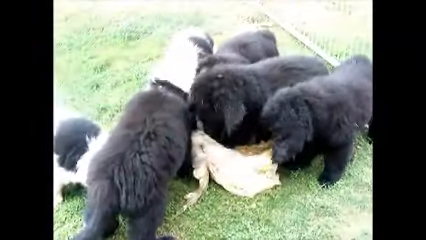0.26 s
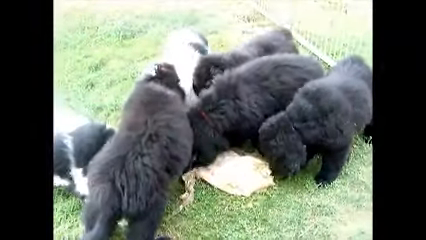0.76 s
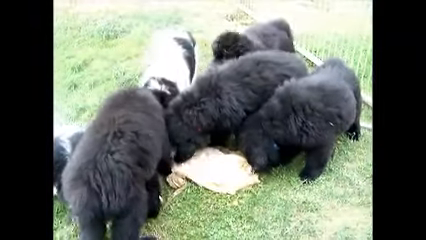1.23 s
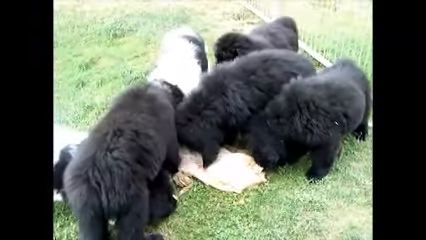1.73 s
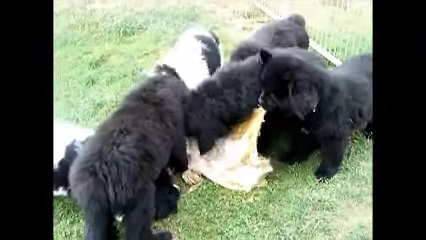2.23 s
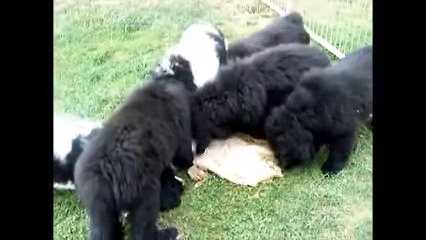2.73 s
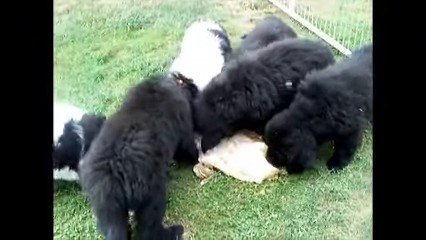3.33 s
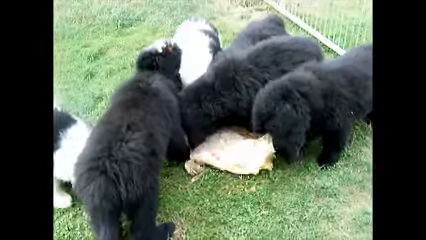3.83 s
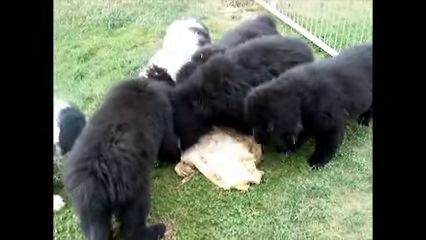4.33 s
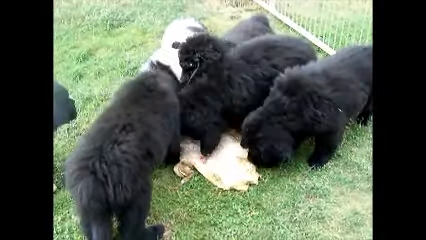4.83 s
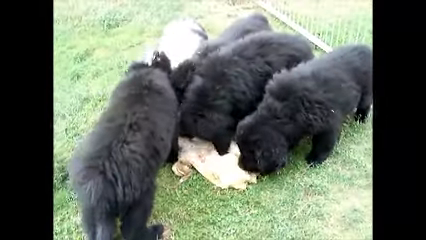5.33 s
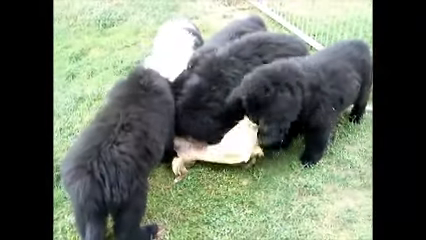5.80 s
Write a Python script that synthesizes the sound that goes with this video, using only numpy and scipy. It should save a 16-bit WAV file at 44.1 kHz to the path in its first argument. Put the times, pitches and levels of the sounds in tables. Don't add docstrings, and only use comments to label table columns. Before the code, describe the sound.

Three puppies chew wet food on a lawn with sharp clicks, smacks and snorts, while birds whistle and chirp over a faint town drone.

```python
import sys
import numpy as np
from scipy import signal
from scipy.fft import rfft, irfft, next_fast_len
from scipy.io import wavfile
from scipy.ndimage import uniform_filter1d, map_coordinates

SR = 44100
rng = np.random.default_rng(int(sys.argv[2]) if len(sys.argv) > 2 else 0)


def ratio_of_db(decibels):
    return 10 ** (np.asarray(decibels, float) / 20)


def pcm_store(signal):
    levels = np.round(np.clip(np.atleast_2d(signal), -1, 1) * 32767)
    wavfile.write(sys.argv[1], SR, levels.astype(np.int16).T)


N = 267246


def unit(x):
    return x / np.sqrt(np.mean(x ** 2) + 1e-20)


def along(points, hz):
    f, v = np.transpose(points)
    return np.interp(np.log(hz + 1), np.log(f + 1), v)


def shape(spectrum):
    return lambda hz: ratio_of_db(along(spectrum, hz))


def curves(rows):
    s, *cols = np.transpose(rows)
    return [np.interp(np.arange(N) / SR, s, c) for c in cols]


def span(rows):
    s, *cols = np.transpose(rows)
    at = np.arange(round(s[0] * SR), min(round(s[-1] * SR), N))
    fade = np.clip(np.minimum(at - at[0], at[-1] - at) / (.004 * SR), 0, 1)
    return at, fade, [np.interp(at / SR, s, c) for c in cols]


def wobble(rate, size=N):
    knots = rng.standard_normal(int(size * rate / SR) + 4)
    return map_coordinates(knots, [np.arange(size) * rate / SR])


def sides(pan_db):
    return ratio_of_db(np.array([pan_db / 2, -pan_db / 2]))


def filtered(x, response):
    m = next_fast_len(N + 8192)
    return irfft(rfft(x, m) * response(np.fft.rfftfreq(m, 1 / SR)), m)[..., :N]


# frequency in Hz, likeness from 0 to 1.
LIKENESS = [(60, 0.61), (120, 0.57), (230, 0.59), (460, 0.64), (920, 0.51), (1810, 0.08), (3590, 0.038),
            (7090, 0.079)]


def rush(gain, patchy_db):
    z = signal.stft(rng.standard_normal((2, N)), nperseg=512)[2]
    field = uniform_filter1d(rng.standard_normal(z.shape[1:]), size=6, axis=0)
    field = uniform_filter1d(field, size=8, axis=1)
    pair = signal.istft(z * ratio_of_db(patchy_db * unit(field)), nperseg=512)[1][:, :N]

    def mid_side_gain(hz):
        turn = np.arccos(np.clip(along(LIKENESS, hz), -1, 1)) / 2
        return gain(hz) * [np.cos(turn), np.sin(turn)]

    mid, side = filtered(pair, mid_side_gain)
    return unit(np.array([mid + side, mid - side]))


def pops(rows, colour, ms, size=768):
    s, db, hz, pan_db, crack_db = np.transpose(rows)[..., None]
    luck = rng.random((len(rows), 2)).T[..., None]
    film = rng.standard_normal((len(rows), size + 4))
    t = np.arange(size) / SR
    u = t / (ms / 1000 * (.75 + .5 * luck[0]))
    swell = 3 * u * np.exp(1 - 3 * u)
    at = (np.round(s * SR).astype(int) + np.arange(size)).ravel()
    tones, cracks = np.zeros((2, 2, N))
    for side in (0, 1):
        late = t - (side - .5) * (luck[1] - .5) * .0002
        gain = ratio_of_db(db + (.5 - side) * np.clip(pan_db, -7, 7))
        tone = gain * swell * np.sin(2 * np.pi * hz * late)
        tones[side] = np.bincount(at, tone.ravel(), N + size)[:N]
        crack = film[:, 3 * side:][:, :size] * np.sqrt(u) * np.exp(-4.5 * u)
        crack /= np.linalg.norm(crack, axis=1, keepdims=True) / np.sqrt(ms * 12)
        cracks[side] = np.bincount(at, (gain * ratio_of_db(crack_db) * crack).ravel(), N + size)[:N]
    return tones + filtered(cracks, shape(colour))


def sing(rows, pan_db=0., shake_hz=0., rate_hz=100., drift_hz=45.0):
    at, fade, (hz, db, *pan) = span(rows)
    beat = np.cumsum(rate_hz * (1 + 0.36 * wobble(90, size=len(at)))) / SR
    shake = shake_hz * signal.sawtooth(2 * np.pi * beat, .2)
    pitch = hz + shake + drift_hz * wobble(150, size=len(at))
    voice = np.sqrt(2) * fade * ratio_of_db(db) * np.sin(2 * np.pi * np.cumsum(pitch) / SR)
    out = np.zeros((2, N))
    out[:, at] = voice * sides(pan[0] if pan else np.full(len(at), pan_db))
    return out


# frequency in Hz, time to fall by 60 dB in seconds.
ECHO_TIMES = [(300, 0.2), (3000, 0.21), (8000, 0.18)]


def yard(x, gap=.012):
    hz, t, z = signal.stft(rng.standard_normal((2, SR // 2)), SR, nperseg=256)
    decay = ratio_of_db(-60 * t / along(ECHO_TIMES, hz)[:, None])
    tail = signal.istft(z * decay, SR, nperseg=256)[1]
    tail = np.pad(tail / np.linalg.norm(tail[0]), ((0, 0), (round(abs(gap) * SR), 0)))
    return signal.fftconvolve(x.mean(axis=0)[None], tail, axes=1)[:, :N]


# time in seconds, peak in dB, cavity pitch in Hz, crack in dB against the cavity tone.
LEFT_PUP = [(0.2674, -11.5, 5840, 1.5), (0.7489, -26, 6100, 3), (0.7806, -15, 5690, 1.5),
            (1.3608, -22.5, 5740, -0.5), (1.4462, -26, 5980, -6), (1.9598, -18.5, 6030, -2.5),
            (2.7086, -26, 5980, -4), (3.0857, -21, 5900, -0.5), (3.304, -17.5, 6250, 3),
            (3.444, -20, 5900, 2), (3.6185, -14, 5740, 0.5), (3.6562, -16, 5580, 1), (4.629, -13, 5590, 1),
            (4.696, -27.5, 5050, -6.5), (5.0071, -21, 6040, 8.5)]
HIGH_RIGHT_PUP = [(0.0618, -7, 5280, -0.5), (0.3422, -15.5, 3820, 6), (0.3628, -13.5, 5070, 0),
                  (0.4973, -20.5, 4740, 3), (0.6601, -15, 3870, 7), (1.042, -28.5, 4770, 2),
                  (2.37, -27, 5440, 12.5), (3.2334, -12.5, 5060, -6), (3.8913, -22, 4960, 7.5),
                  (3.999, -18.5, 3400, -3), (4.0833, -17.5, 5850, 1), (4.1262, -21.5, 4770, 4.5),
                  (4.678, -30.5, 5630, 9), (4.9013, -20, 3480, 3), (4.9456, -21, 3600, 2),
                  (5.1907, -20.5, 5470, -1), (5.3233, -18, 4470, 1), (5.536, -20, 4330, 3.5),
                  (5.601, -13, 2950, 2), (5.6553, -35, 3120, -0.5), (5.8735, -14, 5200, 8),
                  (5.891, -25.5, 4840, 11.5)]
LOW_RIGHT_PUP = [(0.0434, -19, 3660, 1.5), (0.38, -20, 3350, 3.5), (0.9752, -31.5, 3360, 0),
                 (.194, -6.5, 4150, -4), (0.326, -20, 3800, -2.5), (.7086, -13, 3270, 2.5),
                 (0.9183, -17.5, 3110, 1.5), (0.946, -31.5, 3330, 5.5), (1.6078, -38, 3600, 11),
                 (3.2913, -11, 3000, 2.5), (3.471, -19.5, 4680, 4), (3.5765, -30.5, 2880, 2),
                 (4.8268, -26.5, 3630, 3.5), (4.917, -22, 2670, 2), (5.017, -19.5, 3480, 8),
                 (5.257, -28.5, 3590, -6.5), (5.7814, -31, 3490, 6.5), (5.8031, -24, 2860, 5.5),
                 (5.855, -17, 3620, -10), (5.9182, -12.5, 3600, 0.5)]
# left minus right in dB, one number for each puppy in the same order.
PUP_PANS = (8, -5, -5.5)
# time in seconds, peak in dB, cavity pitch in Hz, pan in dB.
WET_TICKS = [(0.2204, -21, 4590, -6.5), (0.2298, -19, 4600, 1.0), (0.2386, -17, 4140, 0),
             (0.3184, -22, 3780, -1.5), (0.7039, -18.5, 3200, -1.5), (0.928, -26.5, 3470, -0.5),
             (1.0104, -38.5, 5770, 3), (2.9218, -21, 4860, 6.5), (2.928, -27, 4240, -1),
             (2.9334, -20, 4960, 5), (2.9434, -24.5, 4680, 2), (2.9762, -18, 5640, 6.0),
             (2.9795, -21.5, 5650, 9.5), (3.018, -23.5, 5850, -2), (3.0338, -23, 3830, 4),
             (3.0964, -22.5, 5700, 4), (3.4817, -26, 3300, 2), (3.4917, -16.5, 5000, -1.5),
             (3.504, -21, 4870, 1.5), (3.5167, -22, 5540, 8), (3.5226, -15.5, 5370, 3),
             (3.7748, -19, 5640, 1), (3.8404, -22, 4510, -3), (3.8562, -22, 5940, 1),
             (3.8696, -25.5, 4530, 0), (3.882, -22, 5940, -0.5), (3.9052, -15.5, 4820, -7),
             (3.9785, -21, 5190, -4), (5.7494, -18, 6500, 3.5), (5.7662, -23, 5850, 7.5),
             (5.8108, -17.5, 5930, 1.5)]
# time in seconds, peak in dB, centre in Hz, crack in dB.
FOOD_SLAPS = [(.659, -24.5, 285, -0.5), (.9175, -31, 247, 0.5), (2.085, -31.5, 1150, 8),
              (2.101, -25.5, 1385, 4.5), (2.338, -32.5, 835, 8.5), (2.919, -26.5, 846, -20),
              (2.96, -28, 266, -7), (3.878, -26, 1740, 8), (3.999, -34.5, 526, 11), (4.335, -27, 257, 7.5),
              (4.353, -26.5, 318, 11.5), (4.555, -28, 254, 1.5), (4.574, -24.5, 248, -11),
              (4.6, -36.5, 301, 9.5), (5.029, -26, 248, -4.5), (5.699, -35, 860, 11),
              (5.984, -31.5, 1340, 4), (5.999, -33, 493, 8.5)]
# frequency in Hz, level in dB.
CRACK_COLOUR = [(500, -25.5), (1500, -17), (2500, -4), (4000, 3), (5800, 2), (7000, -5.5), (8500, -15.5)]
SLAP_COLOUR = [(80, -44.5), (180, -7), (700, 6.5), (1500, 7.5), (2500, 2), (5000, -9.5)]


def chewing():
    mouths = zip((LEFT_PUP, HIGH_RIGHT_PUP, LOW_RIGHT_PUP), PUP_PANS)
    clicks = np.vstack([np.insert(rows, 3, pan_db, axis=1) for rows, pan_db in mouths])
    slaps = np.insert(FOOD_SLAPS, 3, 2, axis=1)
    ticks = np.insert(WET_TICKS, 4, 1.5, axis=1)
    out = ratio_of_db(-5.5) * pops(ticks, CRACK_COLOUR, ms=3.2)
    out += ratio_of_db(-1.0) * pops(clicks, CRACK_COLOUR, ms=1.96)
    return out + ratio_of_db(-0.5) * pops(slaps, SLAP_COLOUR, ms=4.13)


# start, loudest moment and end in seconds, nose level in dB, throat level in dB.
SNORTS = [(0.197, 0.244, .3, -22.5, -61), (0.282, 0.36, .4, -27, -47), (0.646, 0.703, .72, -34, -59),
          (2.921, 2.927, 2.975, -32.5, -45.5), (2.967, 3.023, 3.075, -36.5, -40),
          (3.438, 3.468, 3.495, -20, -36.5), (3.471, 3.512, 3.545, -25, -36.5),
          (3.734, 3.777, 3.84, -39, -41.5), (3.844, 3.896, 3.94, -29.5, -43.5),
          (4.043, 4.067, 4.1, -31, -62), (4.883, 4.925, 4.93, -27.5, -44.5),
          (5.427, 5.44, 5.49, -28.5, -41.5)]
# frequency in Hz, density in dB per Hz.
NOSE_COLOUR = [(1060, -54), (1800, -10.5), (2430, -13.5), (2630, -6), (3090, -2), (3380, 1.5), (3670, -0.5),
               (4140, 2), (4960, 3.5), (6220, 0), (7540, -9.5), (9800, -51), (16600, -120)]
THROAT_COLOUR = [(180, -49.5), (300, -20.5), (686, -4), (830, 0.5), (1190, -3.5), (1590, 1.5), (2070, -5),
                 (2400, 4.5), (3120, -37), (5280, -120)]
# centre in Hz, width in Hz, lift in dB.
NOSTRILS = [(820, 120, 7), (1500, 220, 4), (2700, 200, 6), (3800, 180, 6), (4850, 300, 6), (5600, 200, 3)]


def snorts():
    nose_swell_db, throat_swell_db = 13.5, 4.5

    def lift(hz):
        return ratio_of_db(sum(db / (1 + ((hz - centre) / width) ** 2) for centre, width, db in NOSTRILS))

    nose = rush(lambda hz: lift(hz) * shape(NOSE_COLOUR)(hz), patchy_db=-2.5)
    throat = rush(lambda hz: lift(hz) * shape(THROAT_COLOUR)(hz), patchy_db=0.5)
    sputter = ratio_of_db(3.2 * wobble(350) + 1.5 * wobble(60) - 1)
    out = np.zeros((2, N))
    for start, peak, end, nose_db, throat_db in SNORTS:
        at, fade, (sunk,) = span([(start, 1), (peak, 0), (end, 1)])
        air = ratio_of_db(nose_db - nose_swell_db * sunk) * nose[:, at]
        air += ratio_of_db(throat_db - throat_swell_db * sunk) * throat[:, at]
        out[:, at] += fade * sputter[at] * air
    return out * sides(np.full(N, -2.5))


def arc(start, end, first_hz, last_hz, dbs):
    middle = ((start + end) / 2, (first_hz + last_hz) / 2, dbs[1])
    return [(start, first_hz, dbs[0]), middle, (end, last_hz, dbs[2])]


# start and end in seconds, first and last pitch in Hz, level in dB.
SQUEAKS = [(.12, .155, 3350, 3250, -53), (.145, .2, 2730, 3100, -48), (.52, .545, 2720, 2800, -54),
           (.55, .6, 2280, 2680, -52), (.595, .65, 2750, 3150, -52), (.58, .625, 3420, 3050, -50),
           (.662, .69, 2730, 2680, -50), (.795, .9, 2740, 2770, -50), (1.05, 1.12, 3650, 3000, -53),
           (1.315, 1.345, 3020, 3020, -46), (1.36, 1.48, 3060, 3080, -57), (2.92, 2.96, 860, 820, -48),
           (2.925, 2.95, 4030, 3960, -46), (2.925, 2.99, 2900, 2620, -52), (3.46, 3.53, 3720, 3680, -45),
           (3.65, 3.76, 3870, 3820, -50), (3.765, 3.86, 3290, 3170, -48), (3.75, 3.815, 1640, 1480, -50),
           (3.855, 3.91, 800, 820, -52), (3.94, 4.005, 830, 870, -51), (4.12, 4.2, 5800, 5750, -46),
           (4.36, 4.52, 3700, 3550, -49), (4.5, 4.58, 4780, 4750, -51)]


def squeaks():
    tones = sum(sing(arc(a, b, first, last, (db, db + 2, db)), pan_db=-5, drift_hz=20)
                for a, b, first, last, db in SQUEAKS)
    return tones * ratio_of_db(.5 + np.clip(1.8 * wobble(40) + 2 * wobble(120), -10, 3))


# start in seconds, length in seconds, held pitch in Hz, level in dB, settling time in seconds.
WHISTLES = [
    (4.588, .062, 5500, -38, .014),
    (4.74, .078, 5580, -29, .02),
    (4.916, .077, 5480, -24.5, .018),
    (5.088, .07, 5540, -23, .016),
    (5.256, .07, 5610, -20.5, .011),
    (5.419, .068, 5635, -19, .012),
    (5.584, .068, 5700, -25, .008),
]


def whistles():
    slide_hz, swell_db = 440, 13
    out = 0
    for start, length, held_hz, end_db, settle in WHISTLES:
        s = np.linspace(start, start + length, num=14)
        left = np.exp(-(s - start) / settle)
        points = np.transpose([s, held_hz + slide_hz * left, end_db - swell_db * left ** 1.5])
        out = out + ratio_of_db(.8 * wobble(70)) * sing(points, pan_db=11, drift_hz=12)
    out[1] = np.roll(out[1], 3)
    return out


def flutters():
    out = 0
    for start, _, _, note_db, _ in WHISTLES:
        s, hz, db = start - .03, 5450, note_db - 8
        fall = [(s - .022, hz, db - 12), (s, hz, db), (s + .02, hz - 450, db - 7)]
        out = out + sing(fall, pan_db=5, shake_hz=350, rate_hz=380, drift_hz=180)
        upper = [(s - .012, 5950, db - 5), (s + .016, 5850, db - 4)]
        out += sing(upper, pan_db=8, drift_hz=60)
    return out


# time in seconds, pitch in Hz, level in dB.
NEAR_CALL = [
    (5.905, 4800, -31),
    (5.914, 5800, -36),
    (5.926, 7450, -31),
    (5.942, 6450, -20),
    (5.958, 5650, -13),
]
# start and end in seconds, first and last pitch in Hz, level in dB.
STRANDS = [(5.959, 5.973, 6150, 5750, -13), (5.973, 5.984, 5800, 5450, -10),
           (5.981, 5.995, 5700, 5100, -14), (5.986, 6.003, 6200, 5750, -15), (5.992, 6.0, 5250, 4850, -15),
           (5.997, 6.007, 5150, 4550, -4), (6.007, 6.02, 5500, 4800, -19), (6.012, 6.024, 6000, 5600, -21),
           (6.024, 6.036, 5500, 5150, -13), (6.032, 6.045, 5400, 4750, -17), (6.02, 6.04, 4500, 3500, -29),
           (6.04, 6.058, 4600, 3600, -30)]


def near_sparrow():
    strands = sum(sing(arc(a, b, first, last, (db + 4.5, db, db - 12)), pan_db=-7.5, drift_hz=30)
                  for a, b, first, last, db in STRANDS)
    flicker = ratio_of_db(-1 + 1.5 * np.array([wobble(220), wobble(220)]))
    return (sing(NEAR_CALL, pan_db=0, drift_hz=30) + strands) * flicker


# share of its length, pitch in Hz, level in dB.
CHIRP_FALL = [
    (0, 4650, 1),
    (.2, 4696, 3),
    (.5, 4130, -2),
    (.78, 3614, -4.5),
    (1, 3190, -32),
]
# start in seconds, length in seconds, pitch ratio, level in dB.
CHIRPS = [
    (1.731, 0.034, 0.8, -40.5),
    (1.784, 0.095, 1.0, -29),
    (4.151, .105, 0.93, -31),
    (5.31, .1, 1.09, -32),
    (5.999, 0.085, 1.03, -35),
]


def harsh_chirps():
    lower = upper = 0
    for start, length, ratio, db in CHIRPS:
        rows = np.multiply(CHIRP_FALL, (length, ratio, 1)) + (start, 0, db)
        lower = lower + sing(rows, -9.5, shake_hz=480, rate_hz=110, drift_hz=260)
        raised = np.multiply(rows, (1, 1.21, 1))
        upper = upper + sing(raised, -9.5, shake_hz=300, rate_hz=95, drift_hz=200)
    return (lower + ratio_of_db(-4) * upper) * ratio_of_db(np.clip(5 * wobble(200), -20, 6) - 1)


# start and end in seconds, first and last pitch in Hz, level in dB.
TRILLS = [
    (1.138, 1.226, 6150, 6220, -32),
    (1.226, 1.323, 5650, 5740, -36.5),
    (2.478, 2.586, 6330, 6010, -35),
    (2.578, 2.698, 5690, 5770, -37),
    (5.671, 5.802, 6140, 6530, -35.5),
]


def thin_trills():
    edge_s, edge_db = 0.059, 5
    out = 0
    for a, b, first, last, db in TRILLS:
        held = [(a, first, db - edge_db), (a + edge_s, first, db),
                (b - edge_s, last, db), (b, last, db - edge_db)]
        out = out + sing(held, pan_db=9, shake_hz=220, rate_hz=290, drift_hz=120)
    return out * ratio_of_db(4 * wobble(90))


def birds():
    notes, near, harsh = whistles(), near_sparrow(), harsh_chirps()
    trills = thin_trills() + flutters()
    out = notes + ratio_of_db(-8) * yard(notes * ratio_of_db(3 * wobble(70)), gap=.016)
    out += near + ratio_of_db(-7) * yard(near, gap=.006)
    out += ratio_of_db(-1.5) * harsh + ratio_of_db(-2) * yard(harsh, gap=0.0028)
    return out + ratio_of_db(2.0) * trills + ratio_of_db(-4.0) * yard(trills, gap=0.0085)


# time in seconds, level in dB.
RUSTLE_LEVEL = [(0.0, -36.5), (0.24, -34), (0.47, -38.5), (0.94, -39), (1.55, -38.5), (1.92, -34),
                (2.3, -34), (2.73, -38.5), (3.91, -34.5), (4.14, -31.5), (4.52, -34.5), (4.84, -41),
                (5.13, -39.5), (5.69, -33.5), (6.06, -33)]
# frequency in Hz, density in dB per Hz.
GRASS_COLOUR = [(880, -34.5), (1500, -10.5), (2090, -10.5), (3110, -1.5), (4130, -3.5), (4860, 3.5),
                (5750, 4.5), (6030, 2), (7540, -11.5), (9800, -58), (16600, -120)]


def rustle(count=1500):
    luck = rng.random((count, 4)).T
    start_s = luck[0] * N / SR
    size_db = -2.2 * np.log(luck[1] + .015)
    cavity_hz, pan_db = 3000 + 3500 * luck[2], 12 * (luck[3] - .5)
    ticks = np.array([start_s, size_db, cavity_hz, pan_db, np.full(count, 4.5)]).T
    hiss = ratio_of_db(1.3 * wobble(25)) * rush(shape(GRASS_COLOUR), patchy_db=2.4)
    wet = ratio_of_db(-5.5) * pops(ticks, CRACK_COLOUR, ms=1.36, size=224)
    return ratio_of_db(curves(RUSTLE_LEVEL)[0]) * (hiss + wet)


# pitch in Hz, wander in Hz.
ENGINES = [
    (55, 2.5),
    (86, 3.28),
]
# time in seconds, low engine in dB, high engine in dB.
ENGINE_LEVELS = [
    (0.0, -37.5, -44),
    (2.14, -39.5, -37),
    (3.9, -39.5, -48),
    (5.87, -47, -42.5),
    (6.06, -64, -65),
]


def engines():
    out = np.zeros((2, N))
    for (hz, wander_hz), db in zip(ENGINES, curves(ENGINE_LEVELS)):
        phase = 2 * np.pi * np.cumsum(hz + wander_hz * wobble(5)) / SR
        out += ratio_of_db(db + 1.0 + 2.3 * wobble(9.4)) * np.sin(phase) * sides(np.full(N, .8))
    return out


# pitch in Hz, width in Hz, level in dB.
MACHINE_LINES = [
    (213.4, 20, -51.5),
    (813, 78, -57.5),
    (1380, 14, -63),
]
# start in seconds, end in seconds, level in dB.
WHINES = [
    (0.094, 0.395, -55),
    (0.448, .76, -62),
    (1.032, 1.3, -55.5),
    (1.371, 1.7, -60),
    (1.759, 2.08, -59.5),
    (2.307, 2.6, -59),
    (3.3, 3.6, -53),
]


def machine():
    out = np.zeros((2, N))
    for centre, width, db in MACHINE_LINES:
        line = rush(lambda f: np.exp(-((f - centre) / width) ** 2), patchy_db=0.4)
        out += ratio_of_db(db + 3 * wobble(9)) * line
    whine_hz = 1381
    whine = sum(sing([(a, whine_hz, db), (b, whine_hz, db)], pan_db=2.5, drift_hz=8) for a, b, db in WHINES)
    return out + ratio_of_db(np.clip(6 * wobble(14), -20, 1)) * whine


# frequency in Hz, density in dB per Hz.
RUMBLE_COLOUR = [(15, -44), (30, -11), (45, -7.5), (70, -5), (110, -15), (150, -13), (300, -41)]
DRONE_COLOUR = [(65, -31), (110, -3.5), (140, -9.5), (352, -9), (419, -11.5), (822, -12.5), (1060, -16),
                (1400, -17.5), (1470, -21), (1970, -24), (2600, -22.5), (3380, -42.5), (5720, -120)]
# time in seconds, level in dB.
DRONE_LEVEL = [(0.0, -42), (1.47, -44.5), (1.86, -42), (2.8, -45.5), (3.05, -42), (4.4, -41.5), (5.47, -44),
               (5.7, -39.5), (6.06, -45.5)]


def background():
    rumble = ratio_of_db(-42.0) * rush(shape(RUMBLE_COLOUR), patchy_db=0.0)
    drone = ratio_of_db(curves(DRONE_LEVEL)[0]) * rush(shape(DRONE_COLOUR), patchy_db=3.0)
    return rumble + drone * sides(np.full(N, 2.2)) + engines() + machine()


def scene():
    mouths = chewing() + squeaks()
    echo = ratio_of_db(-6) * yard(mouths, gap=0.0017)
    return mouths + echo + snorts() + birds() + rustle() + background()


def band_limit(x):
    return signal.sosfilt(signal.butter(12, 8000, fs=SR, output="sos"), x)


def record(dry):
    hiss_colour = [(800, -27.5), (2000, -8.5), (6000, 1.5), (8000, -8.5)]  # (Hz, dB per Hz)
    hiss = ratio_of_db(-62.0) * rush(shape(hiss_colour), patchy_db=-4.5)
    x = filtered(dry + hiss, lambda hz: 1 / np.sqrt(1 + (hz / 7650) ** 40))
    x[1] = np.roll(x[1], 3)
    mix = np.clip(x, -1, 1)
    return band_limit(mix)


dry = scene()
out = record(dry)
pcm_store(out)
```